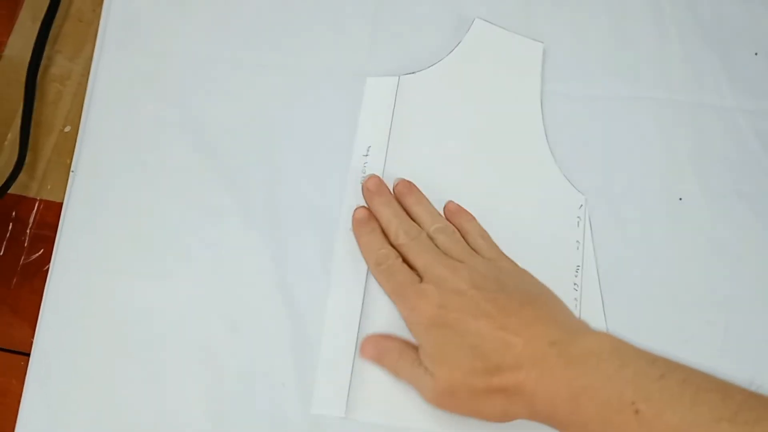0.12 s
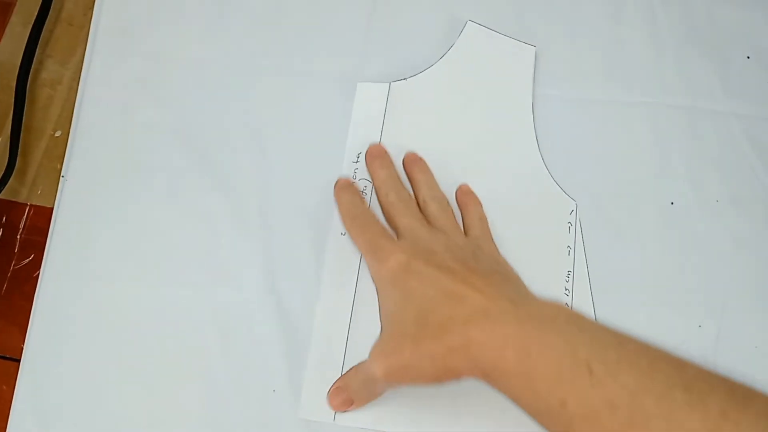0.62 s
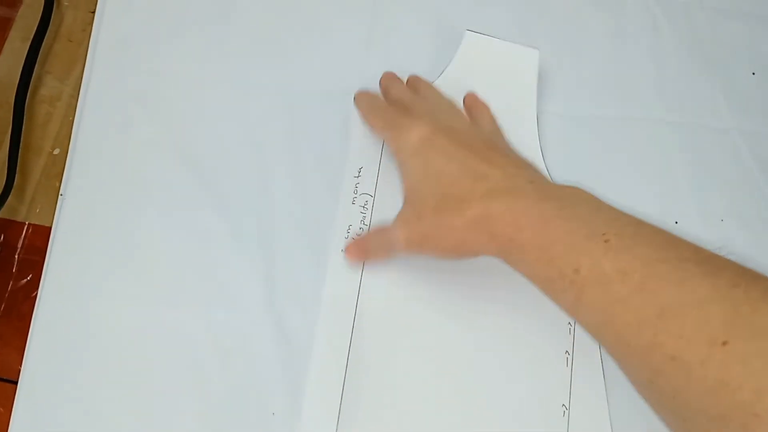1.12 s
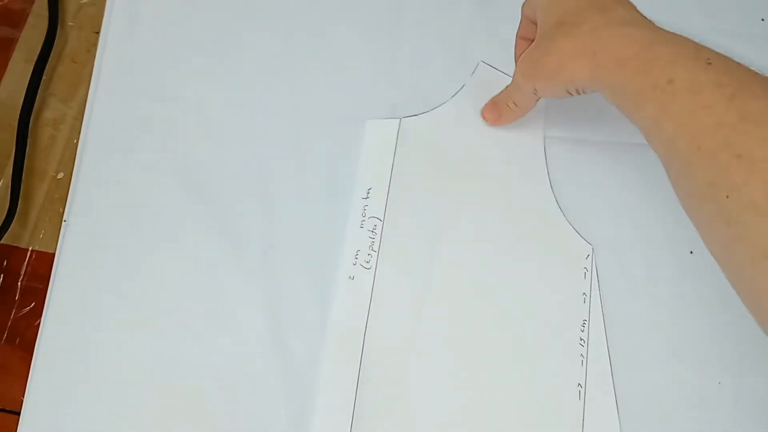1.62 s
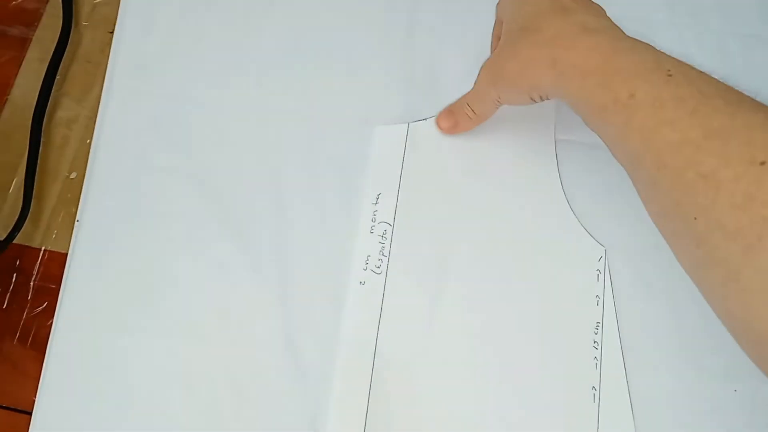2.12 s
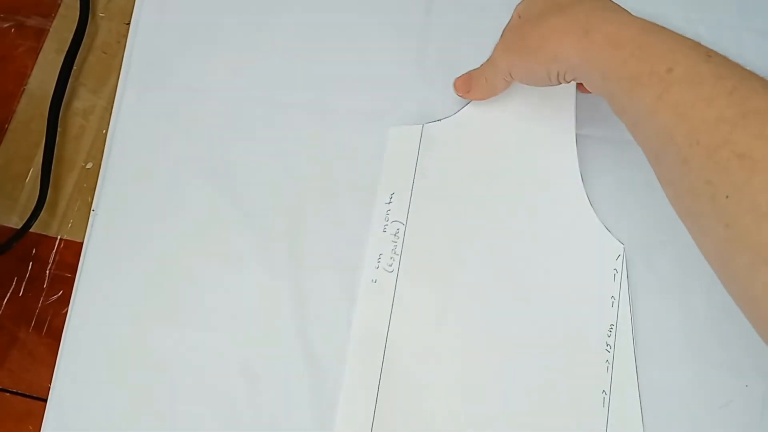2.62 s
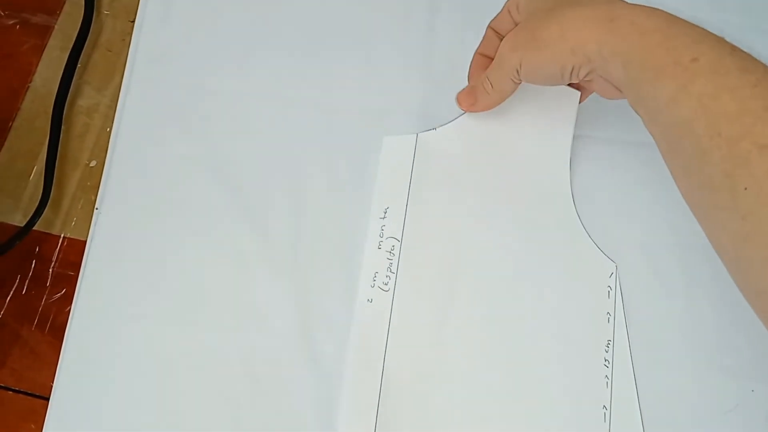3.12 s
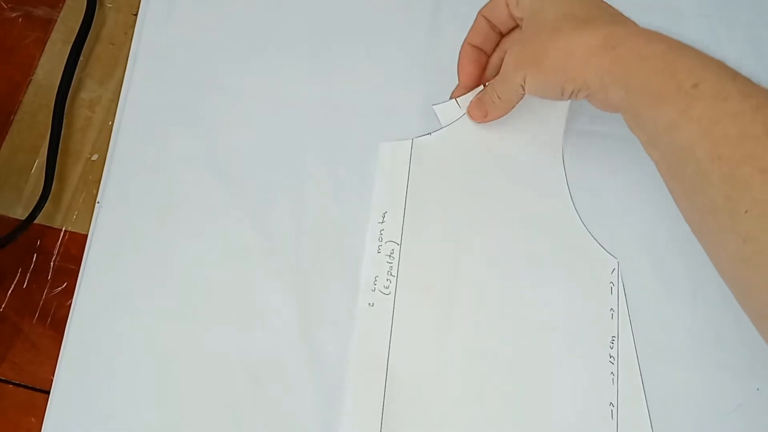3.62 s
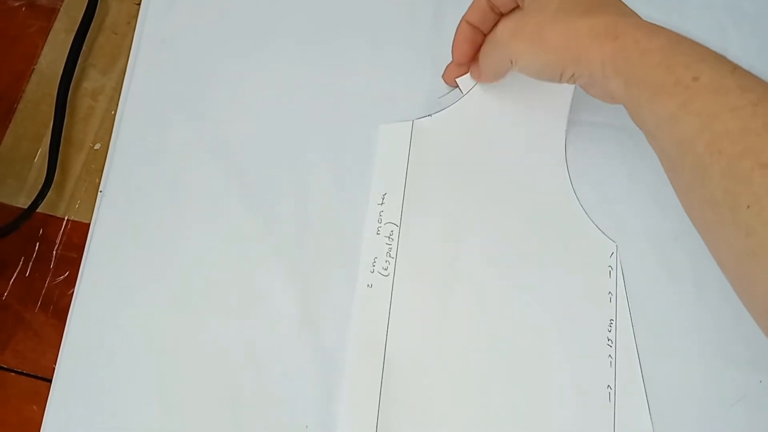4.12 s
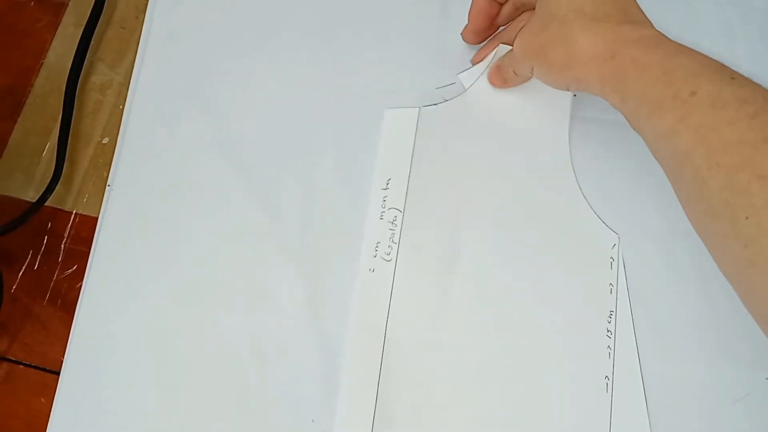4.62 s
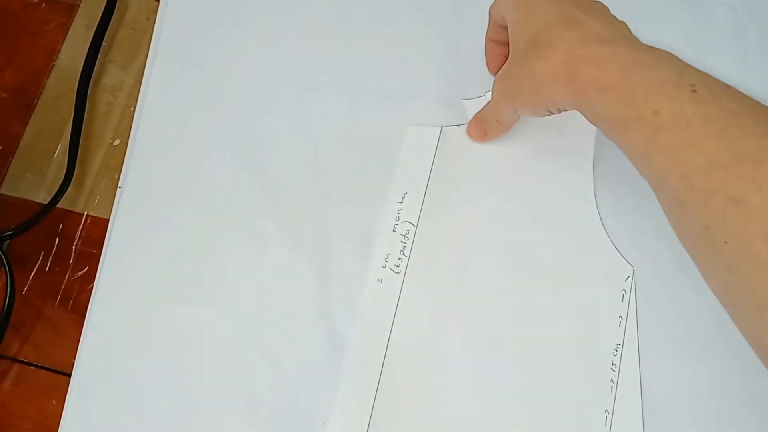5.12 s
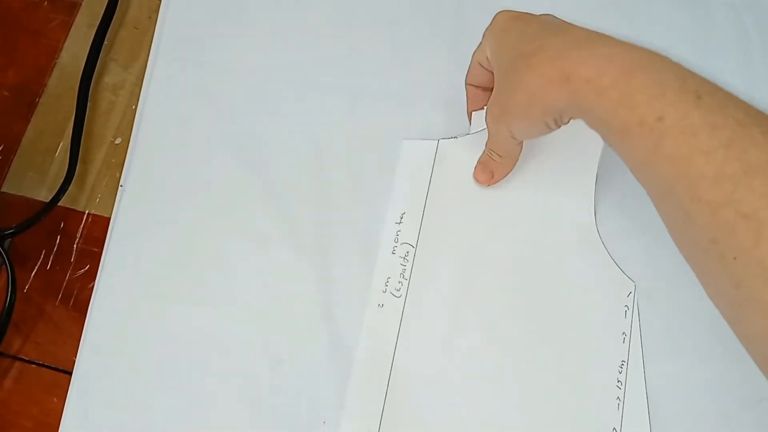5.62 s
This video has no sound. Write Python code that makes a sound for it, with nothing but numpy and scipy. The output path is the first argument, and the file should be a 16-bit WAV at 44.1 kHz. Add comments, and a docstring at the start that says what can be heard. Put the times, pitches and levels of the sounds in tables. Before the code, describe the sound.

A close, dry indoor sound of one paper sheet handled on a cloth-covered table. At 0 s a short scuff with a few crisp clicks fades quickly into faint rubbing. From 0.4 s a bright hissing slide swells, strongest around 0.65 s, and breaks into a dense cluster of crackles and dull finger taps at 0.8-0.9 s. A small brush follows at 1.1 s, then near silence until about 1.6 s, only soft room hiss and a very faint whirr. Light rustles return from 1.75 s, with small snaps at 2.2 s. From 2.3 s the sheet bends with papery ringing, a tiny creak near 2.85 s and sharper pops at 3.15, 3.3 and 3.73 s. Rustling is fuller around 3.9-4.3 s, with thin high ticks at 4.5 s. After a dip at 4.8 s, swishes resume with low table bumps, peaking near 5.5 s and ending mid-slide at 5.75 s.

```python
"""At a cloth-covered table in a quiet room, a paper sheet is slid, pinched at one corner and folded back,
close to the microphone. Random fibre catches excite the drag's hiss, resonances of the bent sheet, its flap
and a dull rub through the cloth; creases snap as decaying pops and the fold creaks in stick and slip.
Fingers press dull puffs from the cloth, the table top hums in three low modes under the hand,
short reverberation follows the paper, and shaped noise and a faint whirr make the room."""
import sys
import numpy as np
from scipy import signal
from scipy.fft import rfft, irfft, next_fast_len
from scipy.io import wavfile

SR = 44100
rng = np.random.default_rng(int(sys.argv[2]) if len(sys.argv) > 2 else 0)


def digitize_waveform(pressure):
    """Quantize a signal to 16-bit integers and store it at the path in sys.argv[1].

    Rows of a 2-D input are taken as channels; values are limited to [-1, 1].
    """
    field = np.atleast_2d(pressure).T
    bounded = np.clip(field, -1, 1)
    quanta = np.round(bounded * 32767).astype(np.int16)
    wavfile.write(sys.argv[1], SR, quanta)


def gain_from_db(level_db):
    """Turn a decibel level (scalar or array-like) into a linear amplitude factor."""
    decades = np.asarray(level_db, float) / 20
    return 10 ** decades


N = 253520  # samples

# resonances of the bent sheet: (frequency [Hz], width [Hz], relative level [dB])
SHEET_MODES = [(2000, 120, -4), (2210, 90, 0), (2560, 90, -1), (2860, 90, -4), (3080, 150, -5),
               (3460, 120, -6), (4030, 140, -1)]


def rms_one(x):
    """Normalisation: equal mean power makes a later gain the rms level."""
    return x / np.sqrt(np.mean(x ** 2) + 1e-20)


def in_time(rows):
    """Linear interpolation: each column of a table becomes one value per sample."""
    s, *columns = np.transpose(rows)
    return [np.interp(np.arange(N) / SR, s, c) for c in columns]


def colour(x, spectrum):
    """Linear filtering by a smooth spectrum, interpolated over log frequency; rms 1."""
    size = next_fast_len(N)
    hz, db = np.transpose(spectrum)
    log_hz = np.log(np.fft.rfftfreq(size, 1 / SR) + 1)
    gain = gain_from_db(np.interp(log_hz, np.log(hz), db))
    return rms_one(irfft(rfft(x, size) * gain, size)[:N])


def band(x, low_hz, high_hz):
    """Band limitation by a steep Butterworth band-pass; rms 1."""
    sos = signal.butter(4, [low_hz, high_hz], "band", fs=SR, output="sos")
    return rms_one(signal.sosfilt(sos, x))


def high_pass(x, hz):
    """Second-order attenuation below the corner."""
    return signal.sosfilt(signal.butter(2, hz, "high", fs=SR, output="sos"), x)


def resonate(x, hz, width_hz):
    """Damped resonance: a pole pair whose radius sets the bandwidth, with about unit gain at its peak."""
    r = np.exp(-np.pi * width_hz / SR)
    poles = [1, -2 * r * np.cos(2 * np.pi * hz / SR), r * r]
    return signal.lfilter([(1 - r * r) / 2, 0, (r * r - 1) / 2], poles, x)


def drift(rate_hz):
    """Random fluctuation: white noise through two equal slow poles, one value per 40 samples; spread 1."""
    r = np.exp(-80 * np.pi * rate_hz / SR)
    noise = rng.standard_normal(N // 40 + 2002)
    slow = signal.lfilter([1], [1, -2 * r, r * r], noise)[2000:]  # settled part
    return np.interp(np.arange(N) / 40, np.arange(len(slow)), rms_one(slow))


def fibres(per_s, spread_db, clump_db):
    """Impulsive friction: random catches of uneven size and either sign, whose strength comes in clumps."""
    sizes = gain_from_db(spread_db * np.minimum(rng.exponential(1, N), 5)) * rng.choice([-1, 1], N)
    caught = rng.random(N) < per_s / SR
    return sizes * caught * gain_from_db(clump_db * drift(17.0))


def body(x, modes, low_hz, high_hz, spill_db, tilt_db=0):
    """Modal superposition: wandering resonances over a broad flutter, dark outside the band; rms 1."""
    middle = np.sqrt(low_hz * high_hz)
    rings = 0
    for k, (hz, width_hz, db) in enumerate(modes):
        gain = gain_from_db(db + tilt_db * np.log2(hz / middle) + 3 * drift(15.0))
        rings = rings + (-1) ** k * gain * resonate(x, hz, width_hz)  # alternating polarity
    lower = gain_from_db(-tilt_db / 3) * band(x, low_hz, middle)
    upper = gain_from_db(tilt_db / 3) * band(x, middle, high_hz)
    return band(rms_one(rings) + gain_from_db(spill_db) * rms_one(lower + upper), low_hz, high_hz)


def crackle(low_hz, high_hz, per_s):
    """Buckling: tiny impulses are dealt among 14 narrow resonances, each ringing at its pitch; rms 1."""
    ticks = fibres(per_s, spread_db=3, clump_db=2)
    dealt = rng.integers(0, 14, N)
    pitches = np.geomspace(low_hz, high_hz, num=14)
    return rms_one(sum(resonate(ticks * (dealt == k) + 1e-18, hz, hz / 95.0) for k, hz in enumerate(pitches)))


def drag_hiss(top_db):
    """Friction noise: dense catches excite a broad spectrum and the free edge, with small buckles."""
    # spectrum of the drag: (frequency [Hz], relative level [dB])
    drag_spectrum = [(1470, -67), (2300, -32.5), (3220, -4.5), (3530, -2.5), (3820, -4.5), (4880, 1),
                     (7330, -0.5), (8110, 3.5), (10600, -7), (15100, -11.5), (15700, -6.5)]
    # bright resonances of the free edge: (frequency [Hz], width [Hz], relative level [dB])
    edge_modes = [(4600, 47, 7.5), (6500, 35, 4.5), (7200, 200, -28), (8000, 240, 13.5), (8450, 1100, 6),
                  (8800, 680, 7.5)]
    catches = fibres(18000, spread_db=-4.5, clump_db=2.0)
    edge = body(catches, edge_modes, 4980, 9800, spill_db=-9.0)
    hiss = colour(catches, drag_spectrum) + gain_from_db(-12.0) * edge
    top = high_pass(hiss, 10500)
    low = signal.sosfilt(signal.butter(2, 5500, "low", fs=SR, output="sos"), hiss)
    patchy_db = 2  # the low part and the top waver separately
    hiss = hiss + (gain_from_db(top_db + patchy_db * drift(5.3)) - 1) * top
    hiss = hiss + (gain_from_db(patchy_db * drift(3.2)) - 1) * low
    return hiss + gain_from_db(-10.5) * crackle(4500, 12000, 610) + gain_from_db(-27.0) * crackle(1100, 4200, 700)


def bent_sheet(tilt_db):
    """Forced plate resonance: fibre catches ring the sheet modes, tilted in level over frequency."""
    catches = fibres(8000, spread_db=1.5, clump_db=2.0)
    ring = body(catches, SHEET_MODES, 1750, 4700, spill_db=-5, tilt_db=tilt_db)
    return ring + gain_from_db(-5.0) * crackle(2030, 4490, 430)


def flap():
    """Band-limited excitation: strongly clumped catches drive the sheet's lower range."""
    return band(fibres(4000, spread_db=4.0, clump_db=5.0), 1203, 1667)


def cloth_rub():
    """Damped transmission: catches sound through dull resonances of the covered top."""
    # dull resonances of the covered top: (frequency [Hz], width [Hz], relative level [dB])
    cloth_modes = [(304, 22, 13), (400, 42, 6.5), (467, 57, -17), (636, 14, 2.5), (920, 64.6, -18.5),
                   (999, 53, 12)]
    catches = fibres(4000, spread_db=1.5, clump_db=4.0)
    return body(catches, cloth_modes, 244, 1240, spill_db=-4.0, tilt_db=2 * drift(0.13))


def rustle():
    """Source and resonator: the hand's strokes drive hiss, bent sheet, flap and the dull rub together."""
    # strokes of the hand on the paper, one curve each:
    # (time [s], drag level [dB], ring of the bent sheet against the drag [dB])
    strokes = [
        [(0.0, -39.5, -12), (0.014, -42, -10), (0.038, -49.5, -8.5), (0.082, -50.5, -19), (0.09, -49, -15),
         (0.266, -58, -20.5), (0.34, -57, -25)],
        [(0.35, -53, -26), (0.382, -47.5, -22), (0.422, -49, -17.5), (0.596, -41.5, -20.5), (0.625, -40.5, -16),
         (0.644, -38, -10.5), (0.675, -44.5, -20), (0.706, -40.5, -20), (0.81, -45.5, -20)],
        [(0.8245, -41, -19), (0.826, -48, -8), (0.84, -47.5, 7.5), (0.852, -44, -10), (0.88, -44.5, -3),
         (0.96, -64, -19)],
        [(0.97, -64.5, -38), (0.992, -56.5, -22), (1.016, -51.5, -33), (1.086, -51.5, -11.5), (1.096, -51, 1),
         (1.182, -77, -22), (1.25, -78, -13)],
        [(1.45, -75.5, -13), (1.562, -73.5, -14), (1.584, -66, -22), (1.59, -67.5, -29), (1.664, -57.5, -23),
         (1.72, -65.5, -20)],
        [(1.73, -65.5, -21), (1.758, -54.5, -26), (1.832, -53.5, -35), (1.854, -49.5, -19), (1.92, -55.5, -21),
         (1.94, -51, -14), (2.012, -57, -15), (2.028, -68, -15), (2.08, -61, -26)],
        [(2.09, -69.5, -16), (2.102, -48.5, -21), (2.165, -57.5, -6), (2.168, -47.5, 0), (2.198, -56, -39),
         (2.206, -49, -2), (2.26, -65.5, -2)],
        [(2.27, -54.5, -4), (2.28, -46.5, -8), (2.31, -55.5, -6), (2.4, -50.5, -6.5), (2.456, -56, -3.5),
         (2.484, -53.5, -1.5), (2.5, -57, -2)],
        [(2.51, -58.5, 1), (2.546, -47.5, 0.5), (2.668, -51, 0.5), (2.712, -45, -6.5), (2.824, -45, 4),
         (2.85, -55, -5), (2.885, -53.5, 5.5), (2.92, -51.5, 2)],
        [(2.93, -53, -2.5), (3.033, -52.5, -3), (3.035, -46.5, -0.5), (3.056, -51.5, -4), (3.088, -56, -0.5),
         (3.1, -58.5, -8)],
        [(3.11, -60.5, -1), (3.12, -50, -4.5), (3.144, -44, -7.5), (3.16, -49.5, 4.5), (3.196, -57, 9),
         (3.212, -59.5, 0.5), (3.25, -56.5, 4)],
        [(3.26, -59, 1), (3.2905, -42.5, -3), (3.293, -41, -1), (3.312, -49.5, -2.5), (3.366, -58.5, -1),
         (3.378, -50, -8), (3.475, -54, -6.5), (3.478, -47.5, -1.5), (3.495, -53.5, -5.5), (3.6, -45.5, -1)],
        [(3.61, -47.5, -1.5), (3.654, -53, 1), (3.7245, -45.5, -12), (3.726, -46, -16), (3.746, -44, -4),
         (3.884, -51, -7), (3.89, -61, -10.5)],
        [(3.9, -51.5, -5.5), (3.936, -42, -5.5), (4.01, -46, -2), (4.016, -42.5, -3.5), (4.082, -51.5, -4.5),
         (4.172, -59, -4), (4.2, -52.5, -3.5)],
        [(4.21, -60.5, -1), (4.237, -40.5, -2.5), (4.241, -44, -4.5), (4.264, -58, 5.5), (4.318, -53.5, -5.5),
         (4.32, -42.5, 2), (4.336, -50, -7.5), (4.37, -53, -2), (4.373, -52, -1.5), (4.415, -60.5, -11),
         (4.46, -59.5, -13)],
        [(4.47, -54.5, -14), (4.538, -40.5, -8.5), (4.56, -42.5, -12), (4.582, -48, -7.5), (4.642, -43, -4.5),
         (4.7, -48, -13), (4.744, -58, 4.5), (4.83, -79, -32)],
        [(4.88, -80.5, -20), (4.91, -53.5, -22), (4.955, -51, -11.5), (4.972, -43, -13.5), (5.005, -48, -16),
         (5.026, -40.5, -16), (5.06, -53, -10), (5.136, -54.5, -10), (5.184, -48, -3), (5.27, -60, -9)],
        [(5.28, -55.5, -6), (5.33, -47, -2.5), (5.365, -51, -5), (5.405, -45, -10.5), (5.435, -53, -13),
         (5.465, -45, -10.5), (5.49, -43.5, -15), (5.515, -38.5, -3.5), (5.56, -51, -12), (5.604, -50.5, -4.5),
         (5.63, -61.5, -13)],
        [(5.64, -59, -12), (5.67, -56.5, -22), (5.678, -53, -4), (5.73, -40.5, -6), (5.749, -39, -1.5)],
    ]
    # shape of the paper, flat at first, then pinched: (time [s], extra level of the top [dB],
    # tilt of the sheet resonances [dB per octave], dull rub at mean drag [dB], extra flap level [dB])
    paper_shape = [(0, 8.5, 1.5, -72, 2), (.4, 11, 5, -77.5, 12.5), (.6, 12.5, -0.5, -87, 3),
                   (.8, 11, -4, -70, 8.5), (1.1, 6, 9.5, -84, -3.5), (1.3, 16, -0.5, -79.5, 9),
                   (1.6, 10, -1.5, -75, 14), (2.1, 5, 6, -78, -6), (2.6, 3, 10, -89, -4.5),
                   (3.05, 1.5, -10, -80, 6), (3.4, 1.5, 6, -79, -3.5), (3.9, 7, 2.5, -86, 4.5),
                   (4.6, 5.5, 0, -76, 9.5), (5.2, 7.5, 11.5, -84, -4), (5.75, 7, -2, -76, 4.5)]
    hiss_db, bend_db = in_time([point for stroke in strokes for point in stroke])
    top_db, tilt_db, rub_db, loose_db = in_time(paper_shape)
    sheet_db = hiss_db + bend_db
    flap_db = sheet_db - 17 + loose_db + 2.5 * drift(0.3)  # follows the bent sheet, wavering
    # the dull rub follows 0.4 of the drag's swing in dB
    rub_db = rub_db + 0.4 * (hiss_db - hiss_db.mean()) + 2.5 * drift(11.0)
    paper = gain_from_db(hiss_db) * drag_hiss(top_db) + gain_from_db(sheet_db) * bent_sheet(tilt_db)
    return paper + gain_from_db(flap_db) * flap() + gain_from_db(rub_db) * cloth_rub()


def swells(rows):
    """Energy addition: rows rise and fade about their moments and sum in power, one gain per level column."""
    t = np.arange(0, N + 40, 40) / SR
    rows = np.array(rows)
    pace_s = np.maximum(rows[:, 1:2], .03)
    shape = gain_from_db(-20 * np.abs((t - rows[:, :1]) / pace_s) ** 1.5)
    gains = [np.sqrt(gain_from_db(2 * db) @ shape ** 2) for db in rows[:, 2:].T]
    return [np.interp(np.arange(N) / SR, t, gain) for gain in gains]


def table():
    """Modal vibration: the weight of the hand keeps three low modes of the top humming unevenly."""
    # modes of the table top: (frequency [Hz], width [Hz])
    table_modes = [(70, 46), (128, 23.8), (237, 25.3)]
    # the hand leans on the table: (time [s], time to rise or fade 20 dB, held to 0.03 or more [s],
    # low mode [dB], middle mode [dB], upper mode [dB])
    lean_rows = [(0, 0.09, -59, -53.5, -62.5), (.4, 1.1, -80, -73.5, -92), (.52, 0.3, -80, -80, -75),
                 (.56, 0.17, -80, -77, -60), (.6, 0.1, -66, -60, -80), (.645, -0.07, -56, -55.5, -64.5),
                 (.71, -0.1, -72.5, -53.5, -84), (.77, -0.19, -66, -54.5, -65), (.84, -0.27, -68, -54, -56),
                 (0.889, 0, -57, -50, -55), (1.06, 0.17, -85, -82, -69), (1.12, 0.03, -59.5, -62.5, -66),
                 (1.26, 0.5, -77, -73.5, -81), (1.48, 0.05, -81, -84, -70), (1.7, .1, -73, -68.5, -71.5),
                 (1.86, 0.04, -72, -65, -74), (2.02, 0, -64, -66, -64), (2.2, 0.58, -84, -66, -90),
                 (2.3, 0, -76, -55, -69), (2.4, 0.16, -85, -89, -64.5), (2.59, 0.22, -68, -68, -75),
                 (2.752, 0.13, -93, -83, -62.5), (2.85, 0, -73, -66, -92), (3.1, -0.05, -72, -68, -65.5),
                 (3.135, 0.05, -62, -72, -80), (3.22, -0.06, -68, -70, -76), (3.3, 1.5, -83, -83, -80),
                 (3.45, 0.5, -82, -85, -89), (3.54, 0, -70, -65, -71), (3.65, 0.3, -71.5, -78, -84),
                 (4.05, 0.16, -84, -67, -67.5), (4.31, 0.11, -55, -66.5, -67.5),
                 (4.58, 0.17, -71, -64, -97), (4.81, 0.15, -68, -70, -65), (4.86, 0.1, -63, -67, -77),
                 (4.93, -0.4, -75, -66, -72), (5.0, -0.04, -67, -52.5, -76), (5.08, 0.07, -74, -56.5, -78),
                 (5.17, -0.37, -69, -59, -73), (5.3, 0.3, -73, -78, -80), (5.35, -0.14, -63, -60.5, -63),
                 (5.41, -0.19, -75, -55.5, -60), (5.535, -0.06, -51.5, -57, -61.5),
                 (5.575, 0.2, -75, -61.5, -77), (5.635, 0.05, -62, -69, -65.5), (5.7, 0, -77, -80, -67)]
    # hum of each mode between leans: (level [dB])
    rest_levels = [-84, -88, -92]
    out = 0
    for (hz, width_hz), lean, rest_db in zip(table_modes, swells(lean_rows), rest_levels):
        hum = rms_one(resonate(resonate(rng.standard_normal(N), hz, width_hz), hz, 3 * width_hz))
        strength = np.abs(signal.hilbert(hum, next_fast_len(N))[:N]) + .2
        steadied = rms_one(hum / strength ** 0.8)  # exponent 1 would flatten the envelope most
        out = out + (lean + gain_from_db(rest_db)) * steadied
    return out


def room_air():
    """Stationary noise: white noise takes the spectrum of the quiet room."""
    # spectrum of the room: (frequency [Hz], relative level [dB])
    room_spectrum = [(20, -50), (60, -15.5), (130, -15.5), (200, -11), (350, -18), (600, -22), (1250, -25),
                     (1900, -32), (3500, -37), (6900, -39), (8300, -31), (16000, -29.5)]
    return gain_from_db(-73) * colour(rng.standard_normal(N), room_spectrum)


def whirr():
    """Narrow-band noise: two resonances in series at one pitch, faint and slightly wavering."""
    hz, level_db = 959, -89
    tone = resonate(resonate(rng.standard_normal(N), hz, 110), hz, 200)
    return gain_from_db(level_db + 2 * drift(13.0)) * rms_one(tone)


def presses():
    """Damped contact: fingers on the cloth give dull puffs of grains, rising and fading exponentially."""
    # fingers land on or press into the cloth: (time [s], time to rise 20 dB, held to 0.002 or more [s],
    # time to fade 20 dB, held to 0.002 or more [s], level [dB], centre of the dull puff [Hz])
    press_rows = [(0.002, -3, 0.03, -65, 413), (0.298, 0.1, 0.1, -66, 402), (0.655, 0.16, 0.24, -64, 593),
                  (0.734, -0.5, 0.44, -63, 890), (0.776, -0.3, -0.04, -56, 990),
                  (0.838, .004, 0.06, -50, 1100), (0.8672, .002, 0.012, -51, 1000),
                  (.872, .015, .08, -53, 520), (1.0, .003, 0.3, -75, 800), (1.1, .003, .04, -70, 450),
                  (2.977, .003, 0.04, -62, 950), (2.977, .003, .04, -65, 390), (3.012, .01, .03, -62, 1250),
                  (3.036, .01, .04, -59, 1150), (3.041, .01, 0.1, -68, 520),
                  (3.293, .004, 0.035, -51, 1250), (3.293, .004, 0.03, -53, 660),
                  (3.294, .004, 0.035, -53, 336), (3.61, 0.17, 0.2, -70, 600),
                  (3.727, -0.5, 0.24, -69, 390), (3.999, -0.4, 0.1, -70, 397),
                  (4.268, 0.05, 0.04, -48.5, 1250), (4.322, -0.17, 0.03, -53, 900),
                  (4.57, 0.3, 0.17, -63.5, 620), (4.74, 0.1, 0.2, -67.5, 1010), (4.813, 0, 0.07, -66, 330),
                  (5.02, 0.14, 0.05, -70, 600), (5.425, -0.1, -0.4, -71, 400),
                  (5.526, 0.13, .01, -61.5, 400), (5.74, 0, 3, -55, 900)]
    out, t = np.zeros(N), np.arange(N) / SR
    grains = fibres(5000, spread_db=3, clump_db=3) + 1e-9
    for s, rise_s, fade_s, db, hz in press_rows:
        near = slice(max(round((s - .3) * SR), 0), round((s + .3) * SR))
        width_hz = 0.56 * hz
        puff = rms_one(resonate(resonate(grains[near], hz, width_hz), hz, width_hz))
        pace_s = np.maximum(np.where(t[near] < s, rise_s, fade_s), .002)
        out[near] += gain_from_db(db - 20 * np.abs(t[near] - s) / pace_s) * puff
    return out


def crease_pops(rows):
    """Sudden release: strain ends in a click, a short pop and decaying noise at the crease's resonance."""
    # spectrum of the snaps' treble: (frequency [Hz], relative level [dB])
    treble_spectrum = [(1500, -40), (3000, -11), (5000, 1), (8200, 0), (11000, -7), (16000, -0.5)]
    noise = rng.standard_normal((3, N + 8000))
    treble = colour(noise[0, :N], treble_spectrum)
    crack = band(noise[1, :N], 1300, 6500)
    out, t = np.zeros(N), np.arange(-300, 4000) / SR
    after = np.maximum(t, 0)
    click = np.diff(np.exp(-(t / 0.00004) ** 2), prepend=0)
    for s, peak_db, hz, treble_db, t60_s in rows:
        at = round(s * SR) - 300 + np.arange(len(t))
        inside = (at >= 0) & (at < N)
        rise = 0.2 * np.exp(np.minimum(t, 0) / 0.0003)  # the crease strains first
        fall = gain_from_db(-60 * after / max(t60_s, .005)) + 0.35 * np.exp(-after / 0.00018)
        shape = np.where(t < 0, rise, fall)
        patch = rms_one(resonate(resonate(noise[2, at + 300], hz, 0.13 * hz), hz, 0.46 * hz))
        cycles = hz * after
        # the pop swells in about a cycle and fades over a few
        pop = np.sin(2 * np.pi * cycles) * 1.6 * (1 - np.exp(-cycles / 0.9)) * np.exp(-cycles / 6)
        impact = 0.29 * pop + gain_from_db(treble_db + 4.0) * click
        at = at[inside]
        voice = gain_from_db(-12.5) * patch[inside] + gain_from_db(-21.5) * crack[at] + gain_from_db(treble_db) * treble[at]
        out[at] += gain_from_db(peak_db) * (shape[inside] * voice + impact[inside])
    return out


def knocked_sheet(rows):
    """Impulse response: each snap rings the sheet modes, less those far from its own pitch."""
    s, peak_db, own_hz = np.transpose(rows)[:3]
    chance_db = rng.normal(0, 2.63, (len(s), len(SHEET_MODES)))
    ring_db, far_db_per_octave = -2, 12
    out = np.zeros(N)
    for (hz, width_hz, db), uneven_db in zip(SHEET_MODES, chance_db.T):
        far_db = far_db_per_octave * np.abs(np.log2(hz / own_hz))
        knocks = np.zeros(N)
        knocks[np.round(s * SR).astype(int)] = gain_from_db(peak_db + db + ring_db + uneven_db - far_db)
        ring = resonate(resonate(knocks + 1e-18, hz, 2.2 * width_hz), hz, .4 * hz)
        out += SR / (2 * np.pi * width_hz) * gain_from_db(-14) * ring  # narrow modes need more gain
    return out


def snaps():
    """Release of stored strain: yielding creases pop and knock the sheet resonances."""
    # creases giving way: (time [s], nominal peak [dB], resonance [Hz], relative treble [dB],
    # time to decay 60 dB, held to 0.005 or more [s])
    snap_rows = [(.0045, -39, 2480, -16, .02), (0.0134, -22.5, 4390, -40, 0.02),
                 (.0136, -35.5, 2220, -25, .02), (0.02, -34, 4120, -20, 0.04),
                 (0.0916, -31.5, 3620, -20, 0.05), (.092, -41.5, 1850, -25, .04),
                 (0.483, -35, 3860, -14, 0.027), (0.656, -30.5, 2780, 0, 0.042),
                 (0.634, -33, 2170, 1, 0.033), (0.648, -29, 3560, -6.5, 0.012),
                 (0.776, -34.5, 2370, -25, 0.025), (0.8253, -22, 3080, -9, 0.028),
                 (0.8340, -30, 2420, -6, .02), (.8375, -23, 2390, -11, 0.02),
                 (0.8398, -27, 4180, -11, .015), (0.8418, -25, 2940, -20, 0.033),
                 (.866, -33, 3940, -12, .015), (0.8675, -31, 1910, -12, 0.015), (0.877, -39, 2000, -8, .02),
                 (1.096, -43, 3200, -5, 0.062), (1.937, -45, 6500, -7, 0.027),
                 (2.1043, -49, 8040, -9, 0.053), (2.1673, -41, 4000, -11, .03),
                 (2.208, -35, 5900, -10, .02), (2.2104, -27, 2740, -4.5, 0.015),
                 (2.2106, -33, 5930, -21, .03), (2.222, -37, 8350, -12, 0.03),
                 (2.273, -35.5, 4380, -9, 0.055), (2.818, -33.5, 5960, -5, 0.046),
                 (3.011, -33.5, 3170, -13, 0.018), (3.034, -31, 2250, -5, 0.014),
                 (3.157, -26, 2250, -24, 0.072), (3.1768, -26, 3430, -45.5, 0.041),
                 (3.292, -22, 2340, -9, 0.059), (3.2965, -29.5, 2060, -23, 0.057),
                 (3.4774, -34, 2200, -32, 0.053), (3.7253, -19, 8000, -5, 0.022),
                 (3.731, -22, 8060, -27, 0.018), (3.7774, -28, 8700, -32, 0.071),
                 (4.018, -30.5, 4100, -4.5, 0.041), (4.119, -34, 4000, -31, 0.13),
                 (4.2397, -26.5, 4200, -13, 0.031), (4.2411, -25, 4340, -19, 0.015),
                 (4.2675, -21.5, 2020, -30, 0.01), (4.2787, -38, 2110, -6, .03),
                 (4.298, -31.5, 2190, -13, 0.025), (4.32, -23.5, 7900, -23, 0.015),
                 (4.3183, -27.5, 3430, -8, 0.012), (4.3215, -33, 2110, -20, .025),
                 (4.331, -37, 3000, -4, 0.008), (4.3717, -31, 7860, -12, 0.03),
                 (4.4182, -33.5, 8900, -20, 0.015), (4.423, -34, 8450, -15, 0.023),
                 (4.4698, -35, 8350, -8, 0.027), (4.476, -35.5, 8450, -25, .032),
                 (4.496, -28.5, 8300, -15.5, 0.047), (4.507, -29, 8200, -8.5, 0.037),
                 (4.516, -27.5, 8600, -15.5, 0.059), (4.533, -27, 8600, -17, 0.03),
                 (4.9096, -49.5, 8100, -7, .03), (5.408, -33, 6230, -5, .015),
                 (5.5197, -26.5, 8800, -20, 0.04)]
    return high_pass(crease_pops(snap_rows) + knocked_sheet(snap_rows), 900)


def walls(x):
    """Diffuse reverberation: convolution with delayed, dull noise that dies away exponentially."""
    t60_s = 0.028
    t = np.arange(0.0048 * SR, .3 * SR) / SR
    noise = rng.standard_normal(len(t)) * gain_from_db(-60 * t / t60_s)
    tail = np.concatenate([np.zeros(int(.004 * SR)), signal.lfilter([.5], [1, -.4], noise)])
    return signal.fftconvolve(x, tail / np.sqrt(np.sum(tail ** 2)))[:N]


def creak():
    """Stick-slip: uneven slips of the fold knock the lower sheet resonances, each slip in another mix."""
    # the fold creaks: (time [s], nominal slip rate [1/s], relative level [dB])
    creak_rows = [(2.815, 260, -49), (2.835, 300, -49), (2.852, 340, -46.5), (2.866, 264, -48),
                  (2.876, 260, -53), (2.886, 280, -64)]
    per_s, level_db = in_time(creak_rows)
    slip_count = np.floor(np.cumsum(per_s * gain_from_db(5.8 * drift(90))) / SR)
    slips = np.diff(slip_count, prepend=0)
    s = np.arange(N) / SR
    knocks = slips * gain_from_db(level_db) * (s > creak_rows[0][0]) * (s < creak_rows[-1][0])
    rings = 0
    for hz, width_hz, db in SHEET_MODES[:6]:
        uneven = knocks * rng.uniform(0.089, 1.87, N) + 1e-18
        rings = rings + gain_from_db(db) * resonate(uneven, hz, 1.19 * width_hz)
    return 420 * resonate(resonate(rings, 2390, 770), 2400, 1200)  # the slip is a soft contact


def scene():
    """Superposition: paper and its reverberation, table hum, room air and whirr add linearly."""
    paper = rustle() + presses() + snaps() + creak()
    echo = gain_from_db(-16) * walls(paper)
    return (paper + echo + table() + room_air() + whirr())[None]


def band_limit(x):
    """A steep low-pass at the top of the band."""
    return signal.sosfilt(signal.butter(12, 17000, fs=SR, output="sos"), x)


def record(dry):
    """Band limitation: one microphone whose top is cut by a steep elliptic low-pass at 15850 Hz."""
    cut = signal.sosfilt(signal.ellip(10, .5, 70, 15850, fs=SR, output="sos"), dry)
    return band_limit(cut)


dry = scene()
out = record(dry)
digitize_waveform(out)
```